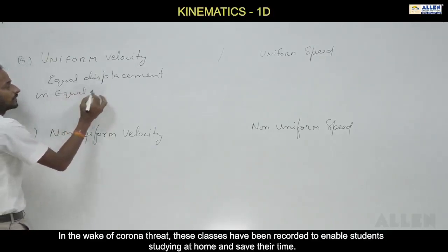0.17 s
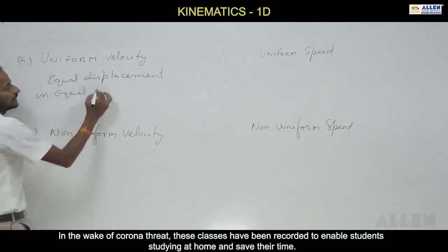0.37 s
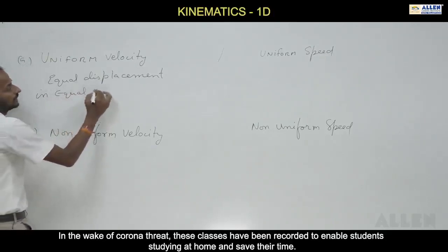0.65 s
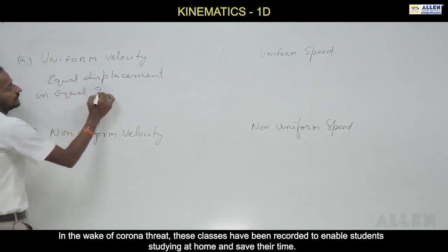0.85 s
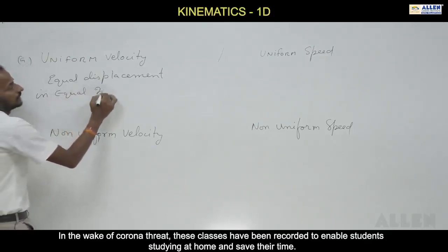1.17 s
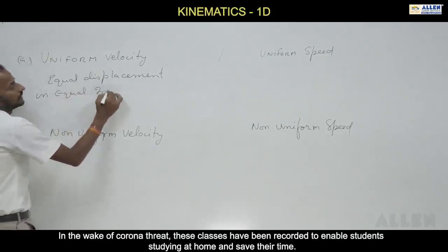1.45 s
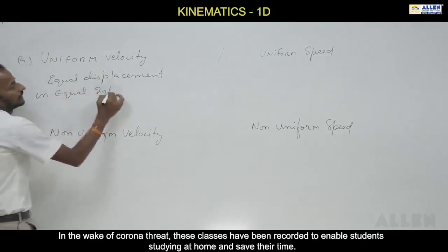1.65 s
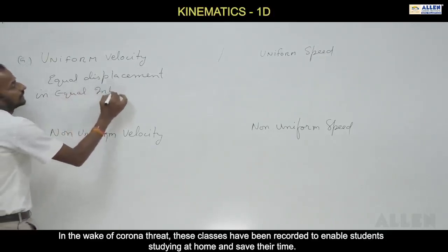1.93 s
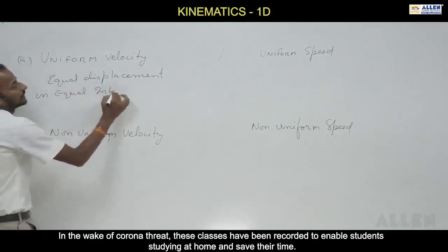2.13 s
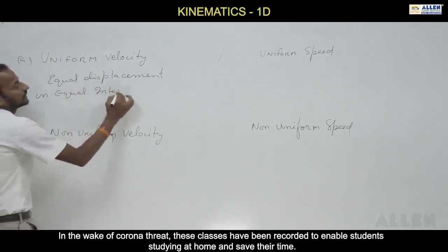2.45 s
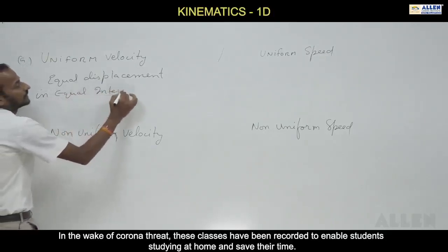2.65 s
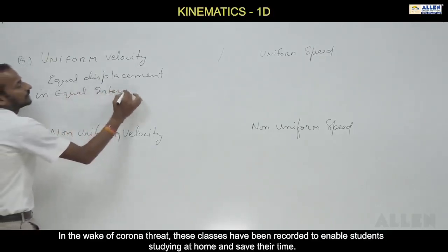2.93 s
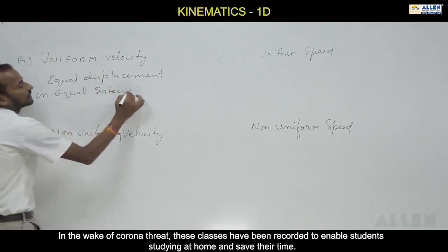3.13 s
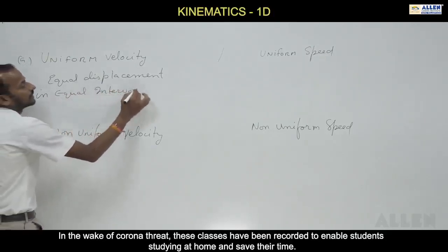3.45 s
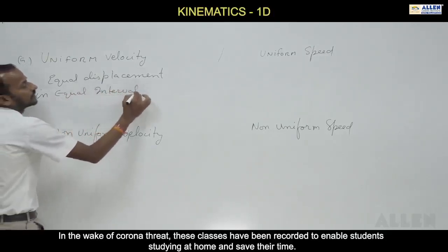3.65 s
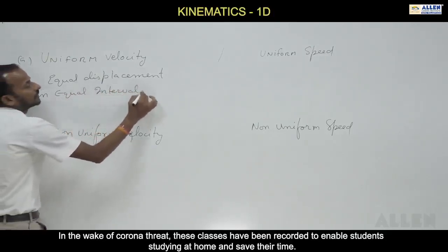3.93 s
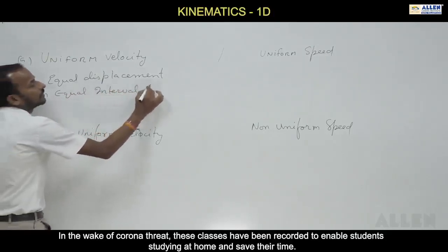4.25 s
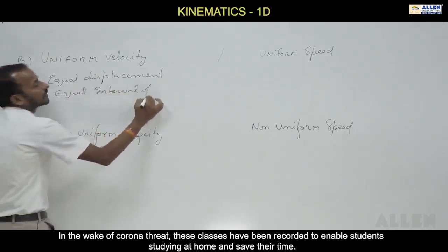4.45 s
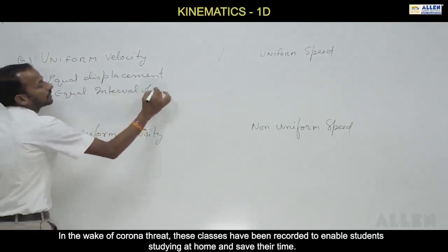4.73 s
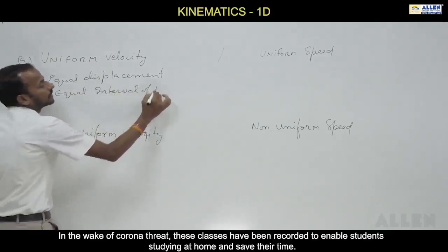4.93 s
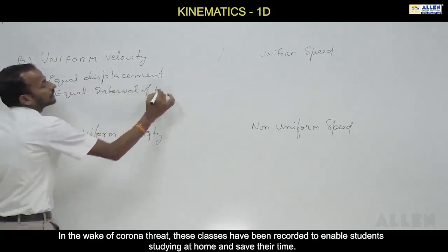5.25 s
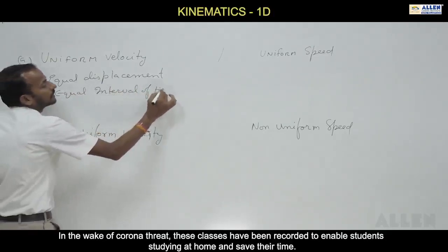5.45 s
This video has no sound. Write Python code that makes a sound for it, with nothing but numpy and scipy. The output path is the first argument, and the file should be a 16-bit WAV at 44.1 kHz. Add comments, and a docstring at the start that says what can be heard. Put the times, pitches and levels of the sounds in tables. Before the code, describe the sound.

A felt marker taps irregularly on a hollow wall-mounted whiteboard, with very faint hissy rubbing between taps over a low room hum.

```python
"""A felt marker writes on a wall-mounted whiteboard in a bare, quiet classroom.
Each touch-down is an impact: damped bending modes knock, the whole board booms, dense short modes click.
Between the knocks the felt rubs with a faint high hiss: stick-slip noise, a thin squeak and a barrel buzz.
Wall echoes and diffuse reverberation answer. Behind are fan air, a wavering motor hum and a fine hiss,
hushed at first, and a low ring that dies away from the start."""
import sys
import numpy as np
from scipy import signal
from scipy.fft import rfft, irfft, next_fast_len
from scipy.io import wavfile
from scipy.ndimage import map_coordinates

SR = 44100
rng = np.random.default_rng(int(sys.argv[2]) if len(sys.argv) > 2 else 0)


def dump_mix(stems):
    """Bounce the given channels to the path in sys.argv[1] as a 16-bit WAV at rate SR."""
    frames = np.atleast_2d(stems).T  # one column per channel
    limited = np.clip(frames, -1, 1)  # hard clip at full scale
    pcm = np.round(limited * 32767).astype(np.int16)
    wavfile.write(sys.argv[1], SR, pcm)


N = 246386


def amp(db):
    """Amplitude gain from level: 20 dB is a factor of ten."""
    return 10 ** (np.asarray(db) / 20)


def unit(x):
    """Normalisation of mean power: scale to rms 1."""
    return x / np.sqrt(np.mean(x ** 2) + 1e-20)


def along(points, hz):
    """Interpolation of (frequency [Hz], value) points on a logarithmic frequency axis."""
    f, v = np.transpose(points)
    return np.interp(np.log(hz + 1), np.log(f + 1), v)


def filtered(x, response):
    """Linear filtering: multiply the spectrum of x by a response of frequency."""
    size = next_fast_len(len(x) + 8192)  # zero padding leaves room for the filter's ringing
    hz = np.fft.rfftfreq(size, 1 / SR)
    return irfft(rfft(x, size) * response(hz), size)[:len(x)]


def coloured(x, spectrum):
    """Spectral shaping by (frequency [Hz], level [dB]) points, at rms 1."""
    return unit(filtered(x, lambda hz: amp(along(spectrum, hz))))


def resonance(hz, centre_hz, width_hz):
    """Frequency response of one damped oscillator, with unit gain at its centre."""
    return 1j * hz * width_hz / (centre_hz ** 2 - hz ** 2 + 1j * hz * width_hz)


def wobble(rate):
    """Slow random modulation: a smooth curve through Gaussian knots, rate of them a second."""
    knots = rng.standard_normal(int(N * rate / SR) + 4)
    return map_coordinates(knots, [np.arange(N) * rate / SR])


def add(track, s, sound):
    """Superposition: mix a sound into the track at s seconds."""
    start = max(round(s * SR), 0)
    track[start:start + len(sound)] += sound[:max(len(track) - start, 0)]


def fade(t, t60):
    """Exponential damping: a decay of 60 dB in t60 seconds."""
    return np.exp(-np.log(1000) * t / t60)


def classroom(x, build_s):
    """Diffuse reverberation: convolution with noise that builds up, then decays at a rate set by frequency."""
    # reverberation time of the room: (frequency [Hz], t60 [s])
    reverb_times = [(100, 0.21), (260, 1.22), (700, 0.54), (1840, 1.03), (10000, 0.38)]
    hz, t, bands = signal.stft(rng.standard_normal(SR), SR, nperseg=256)
    decay = fade(t, along(reverb_times, hz)[:, None])
    tail = signal.istft(bands * decay, SR, nperseg=256)[1]
    tail *= 1 - np.exp(-(np.arange(len(tail)) / SR / build_s) ** 2)
    wet = signal.fftconvolve(x, tail)
    return wet * np.linalg.norm(x) / np.linalg.norm(wet)  # same energy as the source


def background():
    """Stationary sources: shaped noise for fan air and hiss, a frequency-modulated sine for motor hum."""
    # relative spectrum of the fan air: (frequency [Hz], spectral level [dB per Hz])
    air_spectrum = [(12, -73), (20, -35.5), (43, -9.5), (70, -6.5), (85, -9.5), (101, -2), (113, -6),
                    (125, -5), (151, -6), (286, -7), (389, -9), (583, -18.5), (693, -25.5), (2000, -37.5),
                    (2600, -39.5), (4400, -120)]
    # relative spectrum of the fine hiss: (frequency [Hz], spectral level [dB per Hz])
    hiss_spectrum = [(500, -3), (1500, 2.5), (2150, -4), (2600, 0.5), (3200, 0), (6000, -1.5), (10800, -2),
                     (12000, -6)]
    hush_db, rise_start_s, rise_s = -6.6, 0.16, 2.01  # hushed at first, then a smooth rise
    t = np.arange(N) / SR
    air = amp(-51.0 + 0.56 * wobble(11.0)) * coloured(rng.standard_normal(N), air_spectrum)
    hum_hz = 100 + 1.63 * wobble(9.9)
    hum_wave = unit(np.sin(2 * np.pi * np.cumsum(hum_hz) / SR))
    hum = amp(-55.5 + 2.7 * wobble(8)) * hum_wave
    hiss = amp(-70.5) * coloured(rng.standard_normal(N), hiss_spectrum)
    risen = np.clip((t - rise_start_s) / rise_s, 0, 1)
    return amp(hush_db * np.cos(np.pi / 2 * risen) ** 2) * (air + hum + hiss)


def fading_ring():
    """Free decay: noise through two low resonances, still dying away in the room at the start."""
    def body(hz):
        """Modal sum: two squared resonances, the upper one weaker."""
        low = resonance(hz, centre_hz=173, width_hz=22.0) ** 2
        high = resonance(hz, centre_hz=286, width_hz=180) ** 2
        return low + amp(-17) * high

    # the first second is dropped, so the resonances are already ringing
    ring = unit(filtered(rng.standard_normal(N + SR), body))[SR:]
    return amp(-46.0) * ring * fade(np.arange(N) / SR, t60=0.7)


def stroke(length, squeak_hz, squeak_db, barrel_db):
    """Stick-slip friction: tiny grains, scaled by a rising and falling speed, ring barrel and squeak."""
    # relative spectrum of felt sliding on enamel: (frequency [Hz], spectral level [dB per Hz])
    felt_spectrum = [(300, -12), (1500, 4), (2600, -12), (3200, 0.5), (4400, 0), (6500, -0.5), (8000, 2.5),
                     (10800, 1.5), (12000, -14)]
    progress = np.linspace(0, 1, int(length * SR))
    speed = np.abs(np.sin(np.pi * progress)) ** 0.5
    # random gains make the noise grainy
    grains = rng.standard_normal(len(progress)) * amp(4.8 * rng.standard_normal(len(progress)))
    rub = coloured(grains, felt_spectrum)
    squeak = unit(filtered(grains, lambda hz: resonance(hz, squeak_hz, width_hz=420)))
    barrel = unit(filtered(grains, lambda hz: resonance(hz, centre_hz=2610, width_hz=630) ** 2))
    return speed * (rub + amp(squeak_db) * squeak + amp(barrel_db) * barrel)


def strokes():
    """Friction under uneven pressure: each letter is a run of strokes of equal length; the room answers."""
    # letters: (start [s], length [s], strokes, level before pressure changes [dB], mean squeak pitch [Hz])
    letters = [(0.01, 0.1, 1, -77, 9200), (0.65, 0.089, 1, -79, 8900), (0.765, 0.27, 2, -74, 9100),
               (1.044, 0.46, 3, -76.5, 8150), (1.67, 0.11, 1, -72.5, 8500), (1.969, 0.34, 3, -74, 9100),
               (2.554, 0.12, 1, -74, 9600), (2.745, 0.11, 1, -72, 8000), (2.83, 0.1, 1, -72, 9600),
               (3.192, 0.16, 2, -73.5, 10000), (3.472, 0.29, 2, -72, 10100), (4.082, 0.27, 1, -73, 10500),
               (4.359, 0.17, 1, -69.5, 9960), (4.509, 0.14, 1, -73.5, 9700), (4.825, 0.086, 1, -72, 10500),
               (5.057, 0.065, 1, -70.5, 10300), (5.167, 0.08, 1, -75, 10500)]
    # a firmer stroke squeaks more: squeak level re the rub at the usual level, and its dB per dB of stroke
    usual_db, usual_squeak_db, squeak_growth = -72, -8, 1
    pitch_scatter = 0.015  # share of the pitch, from stroke to stroke
    # the barrel buzzes more as the hand moves along the line: level re the rub at time 0, and growth
    barrel_start_db, barrel_db_per_s = -18.5, 2.5
    rubbing = np.zeros(N)
    for start, length, count, db, squeak_hz in letters:
        squeak_db = usual_squeak_db + squeak_growth * (db - usual_db)
        for s in start + length * np.arange(count) / count:
            pitch_hz = squeak_hz * (1 + pitch_scatter * rng.standard_normal())
            barrel_db = barrel_start_db + barrel_db_per_s * s
            add(rubbing, s, amp(db) * stroke(length / count, pitch_hz, squeak_db, barrel_db))
    rubbing *= amp(1.95 * wobble(45))  # the hand's pressure is uneven
    return rubbing + amp(-5.5) * classroom(rubbing, build_s=0.013)[:N]


def panel_knock(t, third_db, top_db, click_db):
    """Modal synthesis: the landing spot and sharpness set how strongly each bending mode is excited."""
    # bending modes, before the landing's own changes: (frequency [Hz], level [dB], t60 [s])
    bending_modes = [(229, -5.5, 0.03), (273.1, 1.5, 0.06), (361.7, 2, 0.039), (472.8, -0.5, 0.084),
                     (549.3, -14, 0.23), (645, -12.5, 0.071), (760, -19, 0.051), (847, -19.5, 0.057)]
    # a sharper landing also wakes the higher modes: their change at a click of sharp_db, and dB per dB
    sharp_db, higher_at_sharp_db, higher_per_click = -19, -11, 0.66
    higher_db = higher_at_sharp_db + higher_per_click * (click_db - sharp_db)
    # spots that favour the third mode ring shorter: factor on t60
    ring = 0.77 * np.exp(-0.0791 * third_db)
    spot_db = [0, 0, third_db] + [higher_db] * len(bending_modes[3:-1]) + [top_db]
    knock = np.zeros(len(t))
    for k, (hz, level, t60) in enumerate(bending_modes):
        sign = (-1) ** (k + 1)  # neighbouring modes start in opposite directions
        knock += sign * amp(level + spot_db[k]) * np.sin(2 * np.pi * hz * t) * fade(t, t60 * ring)
    return knock * (1 - np.exp(-t / 0.00038))


def board_boom(t):
    """Modal synthesis: slow ringing of the whole board on its wall, with a soft onset."""
    # board modes: (frequency [Hz], mean level [dB], t60 [s])
    board_modes = [(27.3, -13, 0.13), (75.4, -27.5, 1.14), (99.4, -30.5, 1.9), (110.5, -18.5, 0.15),
                   (187.5, -25.5, 0.61), (271.6, -23.5, 0.41), (536, -34.5, 0.8)]
    boom = np.zeros(len(t))
    for hz, level, t60 in board_modes:
        swing = np.sin(2 * np.pi * (hz * t + rng.random()))
        boom += amp(level + rng.normal(0, 1)) * swing * fade(t, t60)
    return boom * (1 - np.exp(-(t / 0.019) ** 2))


def click(t):
    """High modal density: many short panel modes of random phase; the soft felt rounds the onset."""
    # relative spectrum of the tip's click: (frequency [Hz], spectral level [dB per Hz])
    click_spectrum = [(450, 1.5), (600, 8.5), (850, -1), (1100, -3), (1400, -5.5), (1700, -11.5),
                      (2150, -22), (2550, -19.5), (3200, -29.5), (4500, -36), (6000, -55)]
    hz = np.arange(450, 6000, 60)
    hz = hz + 15 * rng.standard_normal(len(hz))
    modes = np.sin(2 * np.pi * (hz[:, None] * t + rng.random((len(hz), 1))))
    mixed = unit(amp(along(click_spectrum, hz)) @ modes)
    return mixed * fade(t, t60=0.058) * (1 - np.exp(-(t / 0.0011) ** 2))


def muffled(x, corner_hz):
    """Absorption as a first-order low-pass: walls and desks soak up the treble."""
    return signal.lfilter(*signal.butter(1, corner_hz, fs=SR), x)


def taps():
    """Impact excitation: each landing sounds knock, boom and click; echoes and reverberation follow."""
    # tip landings, each at a new spot; third and top mode are changes to the mode's own level, click is re
    # the landing: (time [s], level [dB], third mode [dB], top mode [dB], click [dB])
    landings = [(0.6214, -27, -7, -10, -20.5), (1.6298, -18, -8.5, -12, -20),
                (1.9357, -22, -7.5, -7, -19.5), (3.1326, -21.5, -7, -22, -28.5),
                (3.8939, -16.5, -1.5, -20, -19), (4.7947, -14.9, -1.5, -2.5, -17.5),
                (5.0417, -19, -8, -18, -31), (5.405, -16.5, -5, -10.5, -24), (5.5690, -19, -1, -3, -24.5)]
    # nearest surfaces that throw the click back: (mean delay [s], level before muffling [dB])
    reflections = [(.0115, -3.5), (.0165, -7.5), (.0225, -11.5)]
    out = np.zeros(N)
    t = np.arange(SR) / SR
    for s, db, third_db, top_db, click_db in landings:
        knock = panel_knock(t, third_db, top_db, click_db)
        tick = amp(click_db) * click(t[:SR // 10])
        add(out, s, amp(db) * (knock + board_boom(t)))
        add(out, s, amp(db) * tick)
        for delay_s, wall_db in reflections:
            echo_s = s + delay_s * (1 + 0.0574 * rng.standard_normal())
            add(out, echo_s, amp(db + wall_db) * muffled(tick, corner_hz=1110))
        add(out, s + .014, amp(db - 7) * classroom(knock, build_s=0.0043))
        add(out, s + .008, amp(db - 2.0) * classroom(muffled(tick, corner_hz=885), build_s=0.0017))
    return out


def scene():
    """Superposition of marker and room at one microphone."""
    return (background() + fading_ring() + strokes() + taps())[None]


def record(dry):
    """Band limitation: an ideal low-pass keeps nothing from 11800 Hz up."""
    return np.array([filtered(channel, lambda hz: hz < 11800) for channel in dry])


dry = scene()
out = record(dry)
dump_mix(out)
```